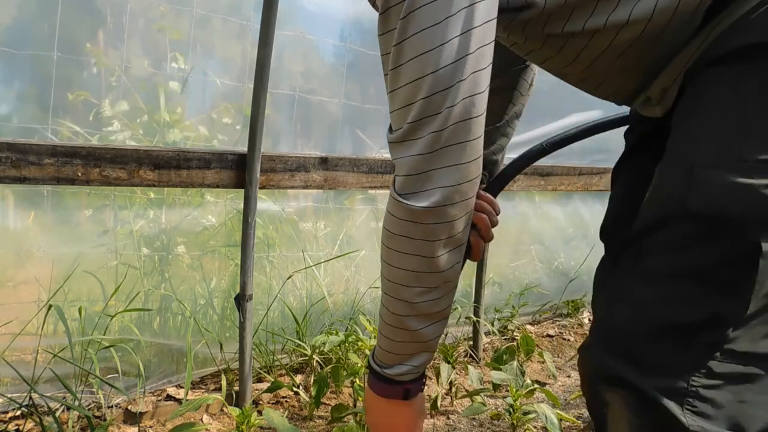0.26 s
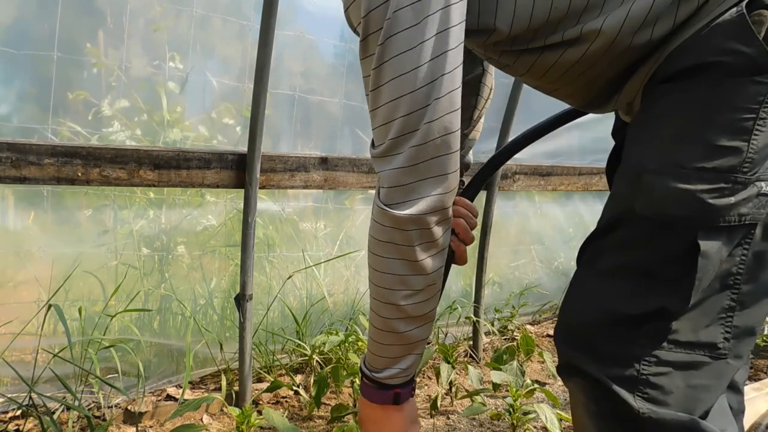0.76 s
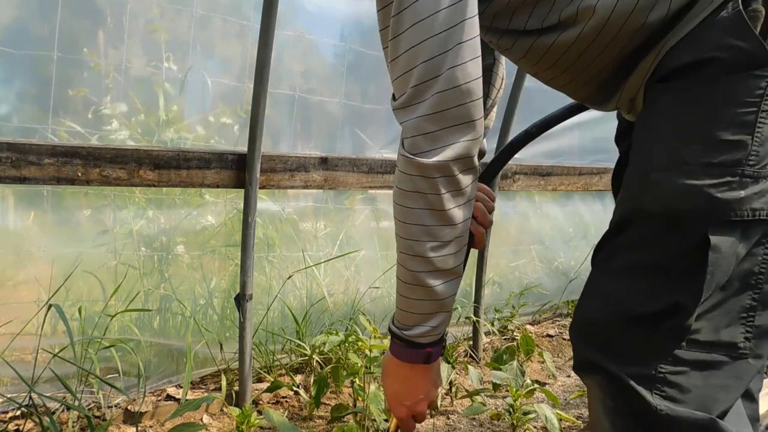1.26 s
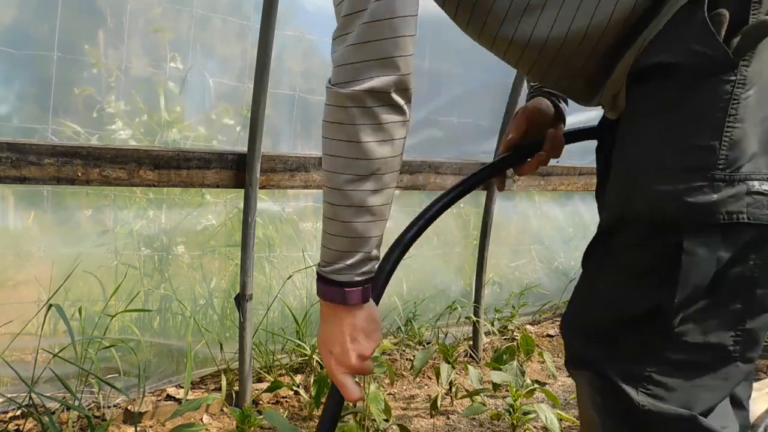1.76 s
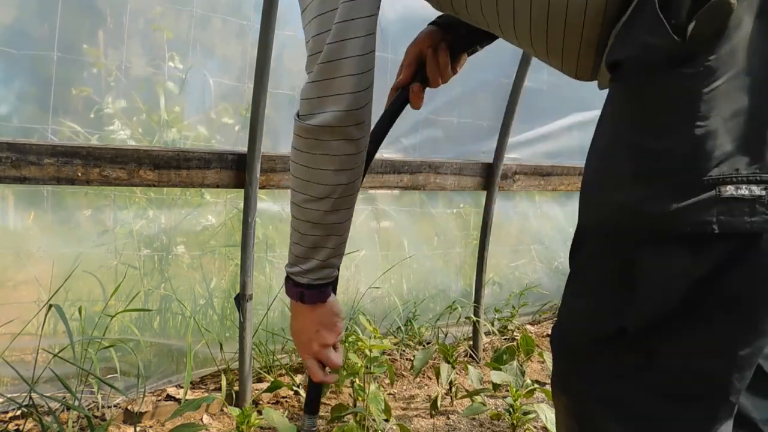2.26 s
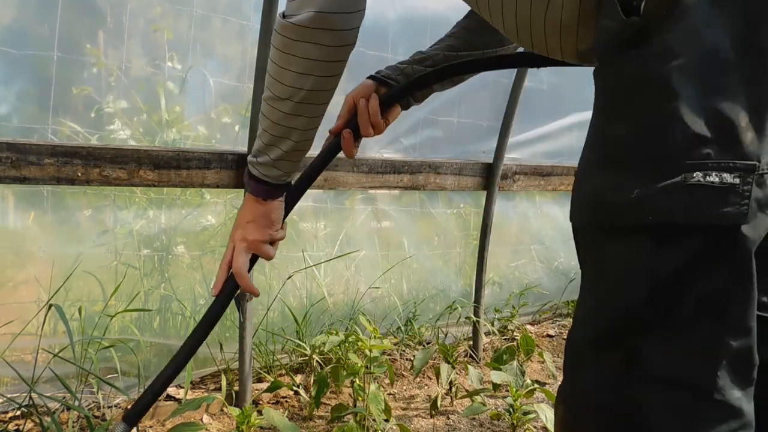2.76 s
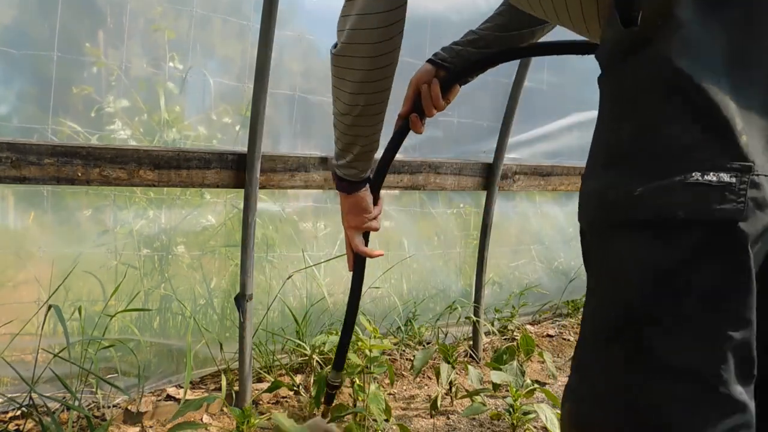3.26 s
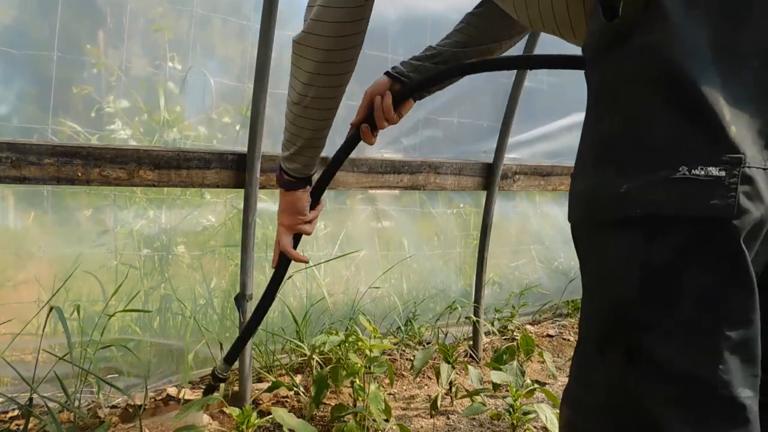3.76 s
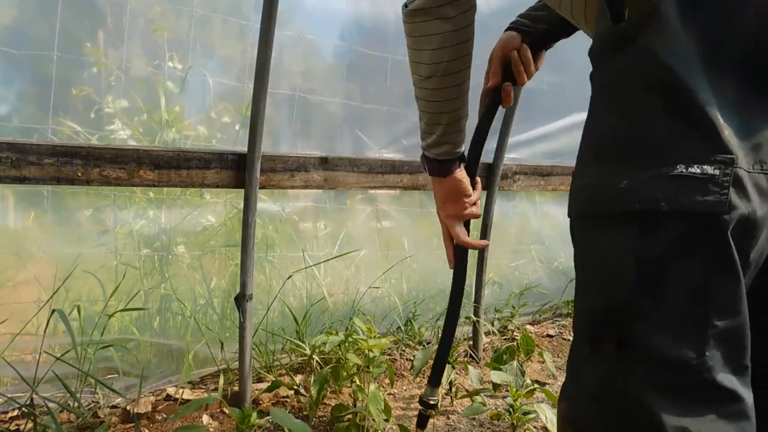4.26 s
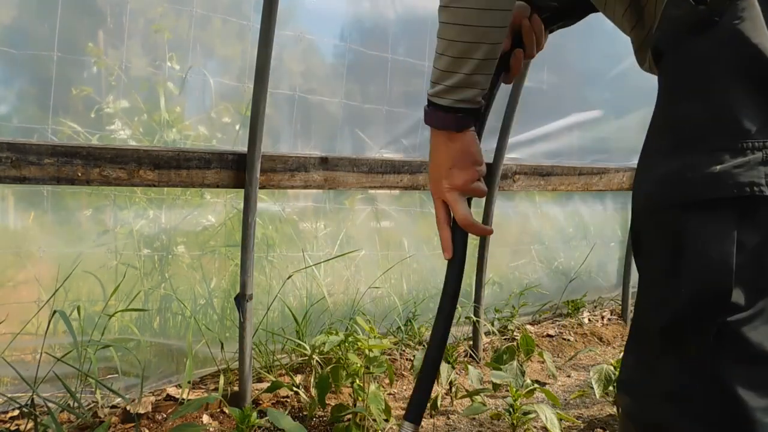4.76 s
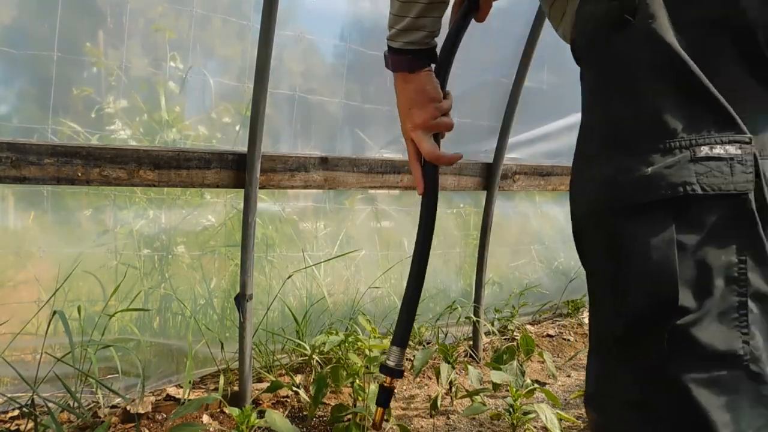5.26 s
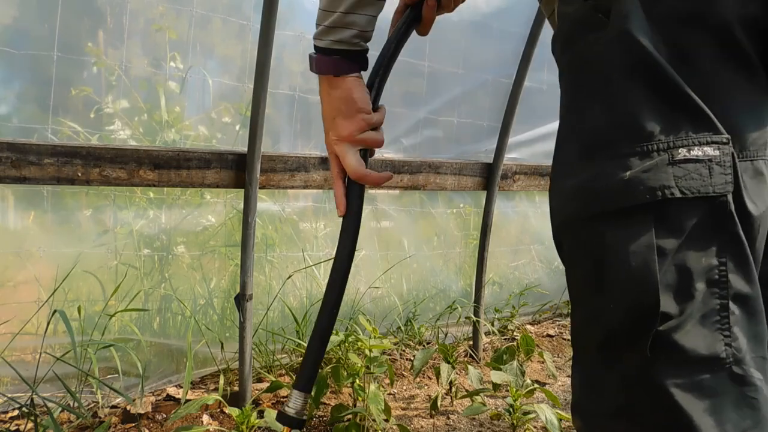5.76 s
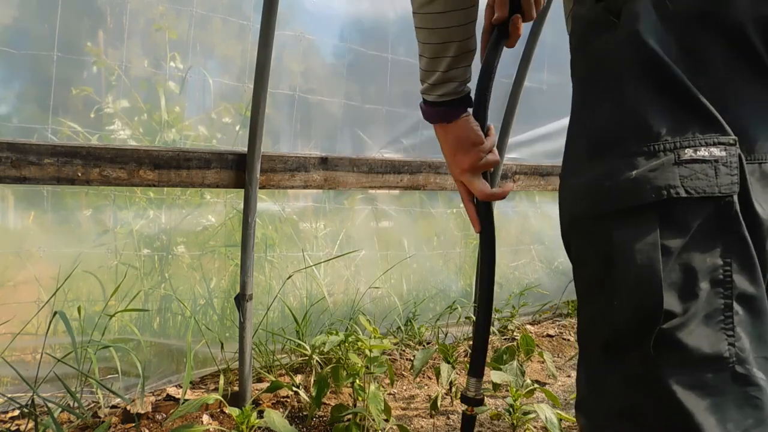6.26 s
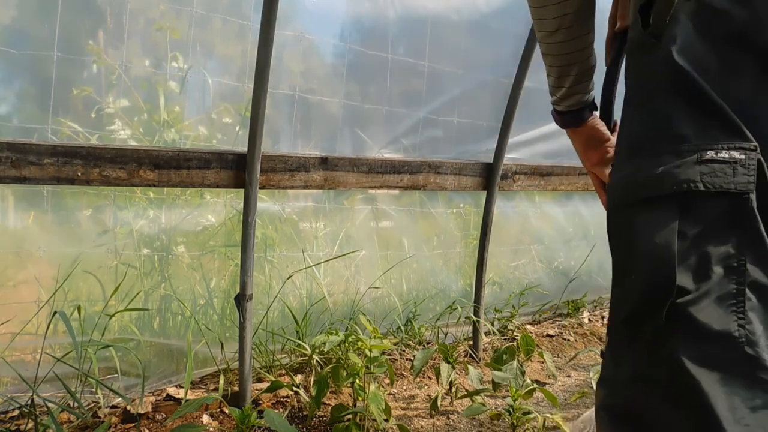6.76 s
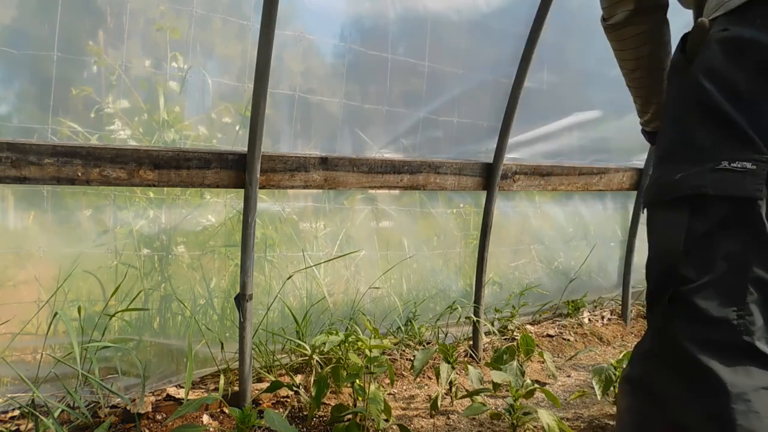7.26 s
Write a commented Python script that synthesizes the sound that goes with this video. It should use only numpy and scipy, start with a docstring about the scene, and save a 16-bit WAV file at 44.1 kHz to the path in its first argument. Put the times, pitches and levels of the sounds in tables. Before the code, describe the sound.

After a few soft handling bumps, a garden hose sprays fine mist with bright hissing, spattering on soil and leaves inside a plastic tunnel.

```python
"""A garden hose sprays a fine mist onto soil and low plants inside a polytunnel.
First come soft bumps and rubs of handling, damped low notes and narrow noise, as the jet begins to swell.
Then shaped noise hisses at the nozzle while random impacts drum, splash and spatter on the earth;
brief hollow rings colour the splashing and drops tick on leaves. The swept spray swells and sinks to the end,
moving resonances and short echoes shift its hollow colour, and low noise of outdoor air rumbles faintly below."""
import sys
import numpy as np
from scipy import signal
from scipy.fft import rfft, irfft
from scipy.io import wavfile
from scipy.ndimage import map_coordinates

SR = 44100
rng = np.random.default_rng(int(sys.argv[2]) if len(sys.argv) > 2 else 0)


def unload_wav(signal):
    """Save mono or channel-first audio to the path in sys.argv[1] as 16-bit WAV at rate SR, clipped to [-1, 1]."""
    wavfile.write(
        sys.argv[1],
        SR,
        np.round(np.clip(np.atleast_2d(signal).T, -1, 1) * 32767).astype(np.int16),
    )


N = 331632
TIME = np.arange(N) / SR


def spray():
    """Superposition: nozzle turbulence and several sizes of impact add up, each with its own spectrum."""
    # strength of the fine spray before its swells: start_s, spatter_db, hiss_db
    mist_levels = [(0, -44.5, -43.5), (0.31, -47, -45), (0.43, -43.5, -38.5), (0.56, -39.5, -37),
                   (1.1, -36.5, -36), (1.49, -34, -33), (2.34, -36, -33), (2.41, -37.5, -38),
                   (2.71, -37.5, -37), (3.02, -37.5, -33.5), (3.4, -38.5, -40), (3.78, -38, -36),
                   (3.96, -35.5, -36.5), (4.53, -38.5, -33.5), (4.65, -39.5, -35), (4.73, -36, -32),
                   (5.36, -33.5, -28.5), (5.81, -35, -31), (6.2, -34.5, -28.5), (6.42, -35, -32.5),
                   (6.62, -37, -36.5), (7.52, -38, -37.5)]
    # how hard the jet bears on the earth: start_s, drum_db, rush_db
    soil_levels = [(0, -52, -61), (.27, -52, -58.5), (.36, -50.5, -67), (.64, -50.5, -65),
                   (.78, -43, -58.5), (1.45, -40.5, -57), (2.05, -44, -59), (2.3, -45, -63.5),
                   (2.57, -51.5, -62), (2.82, -46, -62), (2.92, -47.5, -61), (3.0, -44.5, -65),
                   (3.45, -52.5, -63), (4.42, -47, -62.5), (4.9, -49, -58), (5.42, -42.5, -54.5),
                   (5.88, -47.5, -55), (6.08, -45.5, -56.5), (6.7, -47, -57.5), (7.52, -46, -55.5)]
    # direction of the wet spot, positive to the left: start_s, bearing_degrees
    bearing = [(0, -7), (.6, 3.5), (1.2, 2.5), (2.0, 7), (2.35, 4.5), (2.8, 10.5), (3.3, 2), (3.7, 8.5),
               (4.1, 3.5), (4.45, 1.5), (4.85, 5), (5.2, 4.5), (5.9, 6), (6.3, 5), (6.6, 1.5), (7.2, -1),
               (7.52, -2)]
    # swells over a plant or wet patch and dips between them:
    # centre_s, half_length_s, drum_lift_db, splash_lift_db, spatter_lift_db, hiss_lift_db
    sweeps = [(.305, 0.026, 0, -0.5, 1.5, 0), (.405, .035, 0, 4.5, 1, -2), (.485, .055, 3, 4.5, 0.5, -1),
              (.785, 0.026, -1, 0.5, 0, 1), (1.06, 0.081, 0, 2.4, 1, 1.5), (1.911, .065, 2, 3, -0.5, -0.5),
              (2.22, 0.06, -2, 4, 0, 0), (2.32, .05, -1, 3.5, -1, 2), (2.511, .045, 0, 3.5, 0, 1.5),
              (2.83, .06, 1, 0.5, 0, 1), (3.08, 0.044, -2, -0.5, -0.5, 0), (3.27, .065, 2, 3, 0, 2),
              (3.41, 0.045, 1, -2.5, 0, 1), (3.497, 0.037, 0, 3, 5.5, 4), (3.546, .016, 0, -6, -2, -1),
              (3.605, 0.049, 1, 5, 5.5, 5.5), (3.667, 0.03, 2.5, 4, 6, 5), (4.092, .052, 5, 6.5, 0.5, 3),
              (4.31, .05, 0, 2, 0, 2), (4.49, 0.063, -2.5, 2, 0, 0.5), (4.635, 0.048, 2, -1.5, 1, -3),
              (4.903, 0.054, 4.5, 2, 1, 0.5), (5.19, .027, -1, -2.5, 4, -2), (5.54, 0.078, 0.5, 2, 1, 0),
              (5.6, .021, 1, 1, 4, 0.5), (5.735, 0.021, 4.5, 1, .5, .5), (5.81, 0.028, -1, -2.5, -1, 0),
              (6.075, 0.049, 1.5, 2.5, 4.5, -1), (6.55, 0.31, 2.2, 1.5, -.5, 0.5)]
    # low rush spectrum: frequency_hz, relative_level_db
    rush_spectrum = [(60, -18), (115, -13), (168, -3.5), (205, -4.5), (255, -8.5), (320, 1.5), (410, -1.5),
                     (560, -10)]
    # drumming on soil: frequency_hz, relative_level_db
    drum_spectrum = [(300, -18.5), (440, -8.5), (530, -2), (640, -2.5), (800, 1), (1000, -3), (1400, -11)]
    # churning wet earth: frequency_hz, relative_level_db
    churn_spectrum = [(700, -19.5), (1020, 1.5), (1170, 1.5), (1520, 3.5), (1800, -0.5), (2500, -26)]
    # splashing: frequency_hz, relative_level_db
    splash_spectrum = [(1100, -42), (1550, -8.5), (1850, -2), (2100, -2.5), (2400, -3.5), (2900, -2.5),
                       (3450, -4), (4050, -7), (6500, -15.5)]
    # fine drops landing: frequency_hz, relative_level_db
    spatter_spectrum = [(2200, -20), (3900, -3), (5200, -1.5), (7000, -1), (9500, -2), (11000, -4),
                        (14000, -23)]
    # nozzle hiss: frequency_hz, relative_level_db
    hiss_spectrum = [(5500, -21), (7500, -10), (10000, -5.5), (10900, 0), (11500, -0.5), (12500, -1.5),
                     (14000, -1.5), (15700, -5)]

    spatter_db, hiss_db = in_time(mist_levels)
    drum_db, rush_db = in_time(soil_levels)
    degrees, = in_time(bearing)
    drum_lift_db, splash_lift_db, spatter_lift_db, hiss_lift_db = humps(sweeps)
    # departures from the usual jet and mist
    push_db, mist_db = drum_db + 46, spatter_db + 38

    rush = from_db(rush_db - 1.0) * turbulence(rush_spectrum, flutter_db=0.0)
    drum = shower(drum_spectrum, per_s=8000, spread_db=2.5, flutter_db=0.6)
    drum = drum * from_db(drum_db + drum_lift_db - 2.0)

    # wet earth churns more the harder the jet drums on it
    churn_db = -43 + 0.59 * push_db + 0.12 * mist_db + 0.67 * splash_lift_db
    churn = from_db(churn_db) * shower(churn_spectrum, per_s=9000, spread_db=2.0, flutter_db=0.5)

    # splash feeds on both mist and jet
    splash_db = -38 + 0.63 * mist_db + 0.059 * push_db + splash_lift_db
    splash = from_db(splash_db) * shower(splash_spectrum, per_s=14000, spread_db=1.5, flutter_db=0.58)
    ticks = leaf_ticks(per_s=120, spread_db=5.0, cycles=7.4, low_hz=1310, high_hz=9200)
    ticks = ticks * from_db(splash_db - 17.5)
    blobs = splatters(per_s=60, spread_db=1.0, t60=0.075, low_hz=1227, high_hz=3260, width_ratio=1.15)
    blobs = blobs * from_db(splash_db - 12)

    spatter = shower(spatter_spectrum, per_s=30000, spread_db=2.5, flutter_db=0.12)
    spatter = spatter * from_db(spatter_db + spatter_lift_db + 1.17)
    hiss = from_db(hiss_db + hiss_lift_db + 1.5) * turbulence(hiss_spectrum, flutter_db=0.8)

    landing = drum + churn + splash
    landing = clumped(landing, low_hz=453, high_hz=4270, patchy_db=0.9, rate_hz=11.5, count=14)
    earth = rush + hollow_rings(landing, width_hz=100) + ticks + blobs
    earth = placed(pan(earth, -1), degrees)
    soil = hollow(earth, low_hz=594, upper_hz=1207, low_width_hz=95, middle_width_hz=130,
                  upper_width_hz=88, dip_width_hz=55, dip_share=0.48)

    mist = placed(spatter, degrees) + pan(hiss, 1)
    mist = clumped(mist, low_hz=3900, high_hz=15200, patchy_db=0.72, rate_hz=16.0, count=12)
    mist = phasing(mist, share=0.14, shortest_ms=0.604, longest_ms=2.8, sway_ms=0.089, rate_hz=1.2)
    mist = pan(mist, 0.12 * degrees)

    water = shaded(soil + mist, low_hz=3550, high_hz=7160)
    water = reflections(water, dull_hz=3460, wall_share=0.7)
    return tunnel(water, share=.1, shortest_ms=5, longest_ms=22, sway_ms=0.11, ear_gap_ms=0.043)


def turbulence(spectrum, flutter_db):
    """Flow noise: broadband random pressure takes a spectrum, and its strength flutters."""
    return colour(rng.standard_normal((2, N)), spectrum) * from_db(flutter_db * drift(24))


def shower(spectrum, per_s, spread_db, flutter_db):
    """Shot noise: thousands of random impacts a second merge into a grainy rush."""
    drops = np.array([impacts(per_s, spread_db), impacts(per_s, spread_db)])
    return colour(drops, spectrum) * from_db(flutter_db * drift(24))


def impacts(per_s, spread_db):
    """Random arrivals: drops land by chance, most of them small and a few large."""
    size_db = spread_db * np.minimum(rng.exponential(1, N), 5)
    sizes = from_db(size_db) * rng.choice([-1, 1], N)
    return rms_one(sizes * (rng.random(N) < per_s / SR))


def leaf_ticks(per_s, spread_db, cycles, low_hz, high_hz, count=14):
    """Impulse response: larger drops set leaves ringing, each with a pitch and a place of its own."""
    ticks = 0
    pitches_hz = np.geomspace(low_hz, min(high_hz, 15000), count)
    for hz, lean_db in zip(pitches_hz, rng.normal(0, 4, count)):
        leaf = ring(impacts(per_s / count, spread_db), hz, cycles / hz)
        ticks = ticks + pan(leaf, lean_db)
    return rms_one(ticks)


def ring(clicks, hz, t60):
    """Damped resonance: clicks excite a two-pole note with little bass below it."""
    r, w = from_db(-60 / (t60 * SR)), 2 * np.pi * hz / SR
    # the tiny offset keeps the decaying filter out of vanishing numbers
    return signal.lfilter([.5, 0, -.5], [1, -2 * r * np.cos(w), r * r], clicks + 1e-18)


def splatters(per_s, spread_db, t60, low_hz, high_hz, width_ratio, count=8):
    """Decaying noise bursts: gathered water falls off the leaves in blobs, each with its own pitch."""
    out = 0
    for hz in np.geomspace(low_hz, high_hz, count):
        falls = np.abs(impacts(per_s / count, spread_db))
        envelope = signal.lfilter([1], [1, -from_db(-60 / (t60 * SR))], falls + 1e-18)
        burst = envelope * noise_around(hz, width_ratio)
        out = out + pan(burst, rng.normal(0, 3))
    return rms_one(out)


def hollow_rings(x, width_hz):
    """Resonant filtering: narrow bands of the landing spray briefly swell, like short hollow rings."""
    # centre_s, half_length_s, pitch_hz, lift_db
    band_swells = [(.9, 0.16, 1530, 2.5), (1.35, 0.22, 1480, 1.5), (1.8, 0.11, 1790, 2.5),
                   (2.83, 0.12, 1900, 6.5), (3.55, 0.09, 1720, 2), (4.06, 0.11, 900, 2),
                   (4.45, .1, 2000, 6), (4.717, .07, 1300, 6.5), (6.058, 0.059, 2150, 3),
                   (7.06, 0.038, 925, 4)]
    out = x.copy()
    for s, half_s, hz, lift_db in band_swells:
        lift, = humps([(s, half_s, from_db(lift_db) - 1)])
        out += lift * signal.lfilter(*signal.iirpeak(hz, hz / width_hz, fs=SR), x)
    return out


def clumped(x, low_hz, high_hz, patchy_db, rate_hz, count):
    """Band-wise modulation: clumps of changing drop size make each narrow band swell and fade alone."""
    centres = np.geomspace(low_hz, high_hz, count)
    spectrum, hz, out = rfft(x), np.arange(N // 2 + 1) * SR / N, 0
    for only_this in np.eye(count):
        gain = rms_one(from_db(patchy_db * drift(rate_hz)))
        # overlapping triangular bands; the end bands run on to the edges
        band = irfft(spectrum * np.interp(hz, centres, only_this), N)
        out = out + gain * band
    return out


def placed(pair, degrees):
    """Arrival-time difference: sound from the wet spot reaches the nearer microphone first."""
    lead_ms_per_degree = 0.0073
    return np.array([pair[0], delayed(pair[1], lead_ms_per_degree * degrees)])


def hollow(x, low_hz, upper_hz, low_width_hz, middle_width_hz, upper_width_hz, dip_width_hz, dip_share):
    """Resonance and cancellation: bands rise, fall and glide as the nozzle moves over the ground."""
    # colour of the space between nozzle, soil and legs:
    # start_s, low_lift_db, middle_hz, middle_lift_db, upper_lift_db, dip_hz
    hollow_colour = [(0, 4, 714, 1, 3.5, 1060), (.6, 5.5, 820, 4.5, 4.5, 1040),
                     (1.2, 5.5, 820, -3, 3.5, 1000), (2.0, 0.5, 815, 3.5, -2.5, 910),
                     (2.25, 5.5, 760, 8, 7.5, 1030), (2.55, -4, 770, -0.5, 1, 1010),
                     (3.05, -4, 735, 0, -0.5, 890), (3.7, -1.5, 740, 6.5, 1.5, 890),
                     (4.5, -1.5, 675, 0.5, 0, 850), (4.85, 10.5, 810, 3, 3, 1000),
                     (5.45, 3, 826, 5.5, 4.5, 1080), (5.8, 4.5, 824, 5.5, -3, 1060),
                     (6.1, 9.5, 830, 3, 5.5, 1006), (6.5, 4.5, 870, 1.5, 3.5, 760),
                     (6.9, 4, 930, 4.5, 4, 800), (7.5, 0.5, 990, 8, -13, 860)]
    low_db, middle_hz, middle_db, upper_db, dip_hz = in_time(hollow_colour)
    peaks = [(low_hz, low_width_hz, low_db),
             (middle_hz, middle_width_hz, middle_db),
             (upper_hz, upper_width_hz, upper_db)]
    for hz, width_hz, lift_db in peaks:
        band = swept_band(x.mean(axis=0), np.broadcast_to(hz, N), width_hz)
        x = x + (from_db(lift_db) - 1) * band
    return x - dip_share * swept_band(x.mean(axis=0), dip_hz, dip_width_hz)


def swept_band(x, hz, width_hz, size=256):
    """Two-pole resonance: a band of peak gain 1 whose centre moves block by block."""
    out, state, r = np.zeros_like(x), np.zeros(2), np.exp(-np.pi * width_hz / SR)
    zeros = np.array([1, 0, -1]) * (1 - r * r) / 2
    for i in range(0, N, size):
        poles = [1, -(1 + r * r) * np.cos(2 * np.pi * hz[i] / SR), r * r]
        out[i:i + size], state = signal.lfilter(zeros, poles, x[i:i + size], zi=state)
    return out


def phasing(x, share, shortest_ms, longest_ms, sway_ms, rate_hz, count=4):
    """Comb filtering: quick echoes off hand and leaves shift as the nozzle shakes, so the mist swishes."""
    out = x.copy()
    for ms in np.geomspace(shortest_ms, longest_ms, count):
        path_ms = ms + sway_ms * drift(rate_hz)
        out += share * np.array([delayed(side, path_ms) for side in x])
    return out / np.sqrt(1 + count * share ** 2)


def shaded(x, low_hz, high_hz):
    """Acoustic shadow: legs beside the spray dip a broad band of the sound common to both channels."""
    # centre_s, half_length_s, cut_share
    leg_passes = [(1.1, 0.75, 0.31), (4.6, 0.25, 0.4), (6.48, 0.15, 0.32), (6.95, 0.44, 0.52),
                  (7.45, .25, 0.13)]
    cut, = humps(leg_passes)
    high_pass = signal.butter(8, low_hz, "high", fs=SR, output="sos")
    low_pass = signal.butter(2, high_hz, fs=SR, output="sos")
    # filtering both ways keeps the band in phase, so that subtracting it cuts
    band = signal.sosfiltfilt(low_pass, signal.sosfiltfilt(high_pass, x.mean(axis=0)))
    return x - np.clip(cut, 0, 1) * band


def reflections(x, dull_hz, wall_share):
    """Comb filtering: ground and plastic wall return dull copies along paths that wander with the hand."""
    share, sway_hz = 0.1, 0.43
    ground_ms = 1.485 + 0.11 * drift(sway_hz)
    wall_ms = 3.38 + 0.13 * drift(sway_hz)
    dull = signal.sosfilt(signal.butter(1, dull_hz, fs=SR, output="sos"), x)
    # reading earlier by the filter's own delay keeps the path times true
    filter_lag_s = 1 / (2 * np.pi * dull_hz)

    def echo(ms):
        """Propagation delay: both dull channels arrive later by a moving path time."""
        read_s = TIME - ms / 1000 + filter_lag_s
        return np.array([np.interp(read_s, TIME, side) for side in dull])

    return (x + share * (echo(ground_ms) + wall_share * echo(wall_ms))) / np.sqrt(1 + share ** 2)


def tunnel(x, share, shortest_ms, longest_ms, sway_ms, ear_gap_ms, count=8):
    """Scattering: hoops, film and clothing return weak echoes whose paths wander with the hose."""
    out = x.copy()
    for ms in rng.uniform(shortest_ms, longest_ms, count):
        path_ms = ms + sway_ms * drift(0.52)
        for side, offset_ms in enumerate(rng.normal(0, ear_gap_ms, 2)):
            read_s = TIME - (path_ms + offset_ms) / 1000
            out[side] += share * np.interp(read_s, TIME, x[side], left=0)
    return out / np.sqrt(1 + count * share ** 2)


def bumps(contact_s, rub_share):
    """Damped oscillation: each bump starts a decaying note, blurred by the rub of hose on cloth."""
    # start_s, level_db, pitch_hz, t60_s
    knocks = [(.018, -35, 440, .085), (.029, -40, 190, .06), (.031, -42, 320, .07), (.049, -44, 260, .06),
              (.224, -39, 230, .035), (.2245, -37.5, 105, .05), (.25, -51, 65, .08), (.293, -43, 450, .035)]
    out = np.zeros(N)
    for s, db, hz, t60 in knocks:
        age = np.maximum(TIME - s, 0)
        rub = noise_around(hz, 1.5)
        envelope = from_db(db - 60 * age / t60) * (1 - np.exp(-age / contact_s))
        out += envelope * (np.sin(2 * np.pi * hz * age) + rub_share * rub)
    return out


def rubs(width_ratio):
    """Friction noise: the hose slides through hand and over cloth in soft low swells with no attack."""
    # centre_s, half_length_s, level_db, pitch_hz
    slides = [(.045, .02, -47, 380), (.14, .06, -55, 400), (.27, .02, -55, 400), (0.547, .04, -63.5, 190),
              (1.45, .12, -62, 170), (1.88, .08, -61, 166), (5.45, .17, -63, 165)]
    out = np.zeros(N)
    for s, half_s, db, hz in slides:
        swell, = humps([(s, half_s, from_db(db))])
        out += swell * noise_around(hz, width_ratio)
    return out


def outdoor_air():
    """Low-frequency turbulence: fluttering noise makes a faint rumble."""
    # frequency_hz, relative_level_db
    air_spectrum = [(20, -2), (60, 1), (100, -2.5), (200, -12), (600, -6.5), (2000, -35)]
    return from_db(-71) * turbulence(air_spectrum, flutter_db=4.0)


def colour(pair, spectrum):
    """Spectral shaping and coherence: mid and side noise take a spectrum and a pitch-dependent width."""
    # left-right correlation: frequency_hz, correlation
    likeness = [(40, .62), (110, .7), (220, .84), (550, .965), (1400, .86), (2000, .72), (2600, .62),
                (4000, .43), (6000, .43), (8000, .36), (9900, .2), (11000, .72), (14000, .8)]
    hz = np.maximum(np.arange(N // 2 + 1) * SR / N, 1)
    nearest_hz = np.clip(hz, spectrum[0][0], spectrum[-1][0])
    octaves_outside = np.abs(np.log2(hz / nearest_hz))
    # beyond the ends of the table the level falls 20 dB an octave
    mid, side = rfft(pair) * from_db(at_hz(spectrum, hz) - 20 * octaves_outside)
    alike = np.clip(at_hz(likeness, hz), -.9, .99)
    side = side * np.sqrt((1 - alike) / (1 + alike))
    return rms_one(irfft(np.array([mid + side, mid - side]), N))


def noise_around(hz, width_ratio):
    """Band-pass filtering: white noise keeps a band about one pitch, at rms 1."""
    band = signal.butter(2, [hz / width_ratio, hz * width_ratio], "band", fs=SR, output="sos")
    return rms_one(signal.sosfilt(band, rng.standard_normal(N)))


def delayed(x, ms):
    """Propagation delay: one channel is read through a moving delay by cubic interpolation."""
    return map_coordinates(x, [np.arange(N) - ms * SR / 1000], order=3)


def pan(x, db):
    """Level difference: the left channel exceeds the right by db more than before."""
    return x * from_db(np.vstack([db, -db]) / 2)


def drift(rate_hz):
    """Low-pass random process: slow chance with rms 1, made at every 40th sample and interpolated."""
    r = np.exp(-80 * np.pi * rate_hz / SR)
    steps = rng.standard_normal(N // 40 + 2002)
    # drop the filter's settling time
    slow = signal.lfilter([1], [1, -2 * r, r * r], steps)[2000:]
    return np.interp(np.arange(N) / 40, np.arange(len(slow)), rms_one(slow))


def humps(rows):
    """Gaussian envelopes: rows of centre_s, half_length_s and heights sum to one curve per height."""
    s, half_s, *heights = np.transpose(rows)
    return np.array(heights) @ np.exp(-((TIME - s[:, None]) / half_s[:, None]) ** 2)


def in_time(rows):
    """Linear interpolation: each column of a curve is read at every sample."""
    s, *columns = np.transpose(rows)
    return [np.interp(TIME, s, column) for column in columns]


def at_hz(points, hz):
    """Logarithmic pitch scale: a spectrum is interpolated along log frequency."""
    f, value = np.transpose(points)
    return np.interp(np.log(hz), np.log(f), value)


def from_db(db):
    """Decibel law: 20 dB is a tenfold amplitude."""
    return 10 ** (np.asarray(db) / 20)


def rms_one(x):
    """Power normalization: a mono signal, or the centre of a stereo pair, gets rms 1."""
    centre = np.atleast_2d(x).mean(axis=0)
    return x / np.sqrt(np.mean(centre ** 2) + 1e-20)


def scene():
    """Superposition: spray and handling add over the faint rumble of outdoor air."""
    handling = bumps(contact_s=0.0028, rub_share=0.91) + rubs(width_ratio=1.13)
    return spray() + handling + outdoor_air()


def record(dry):
    """Band limiting: an elliptic low-pass cuts the top steeply above 15800 Hz."""
    return signal.sosfilt(signal.ellip(14, .1, 90, 15800, fs=SR, output="sos"), dry)


dry = scene()
out = record(dry)
unload_wav(out)
```